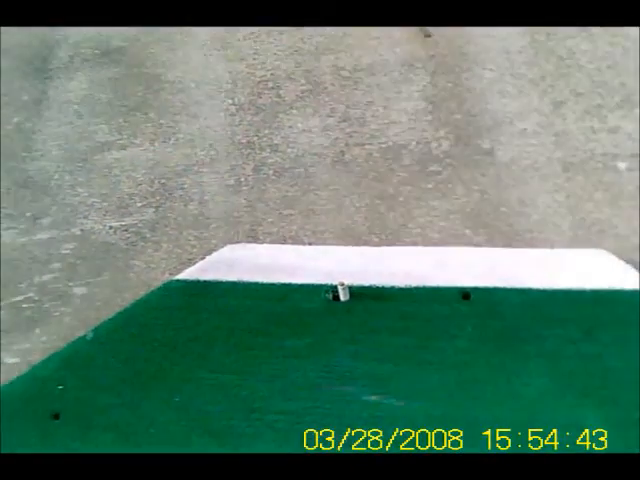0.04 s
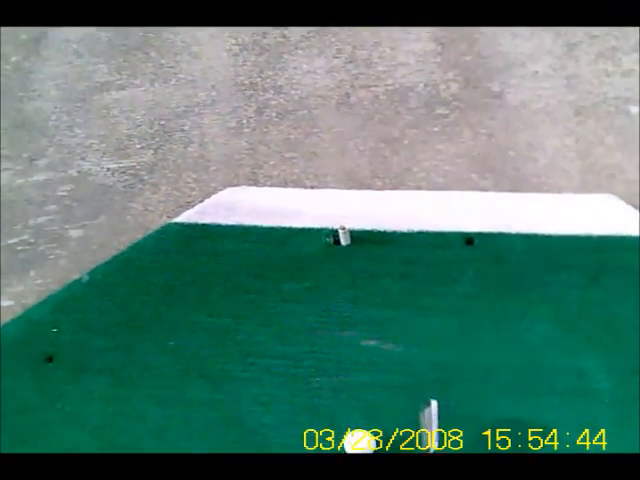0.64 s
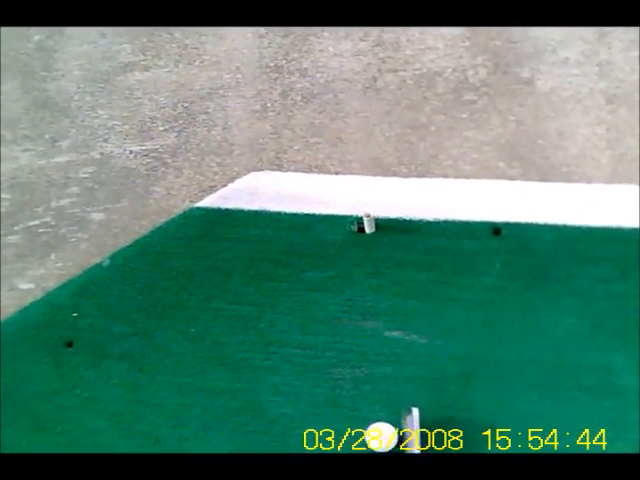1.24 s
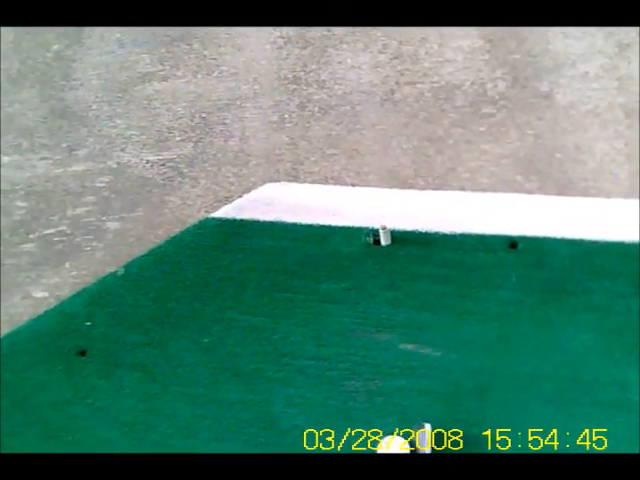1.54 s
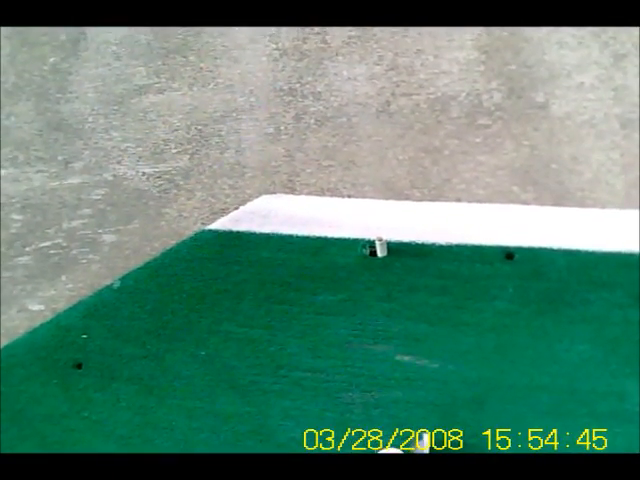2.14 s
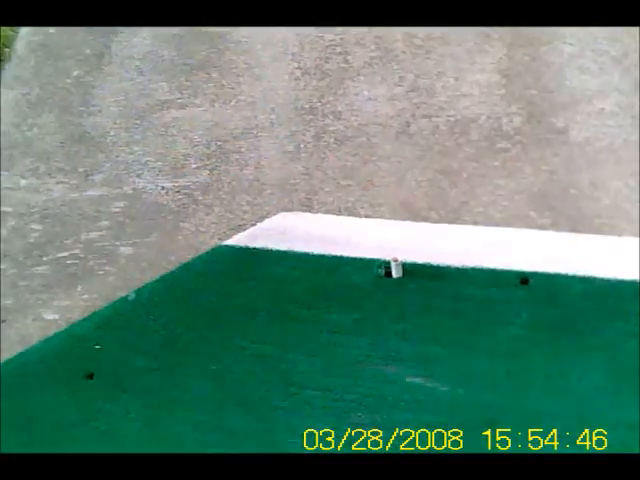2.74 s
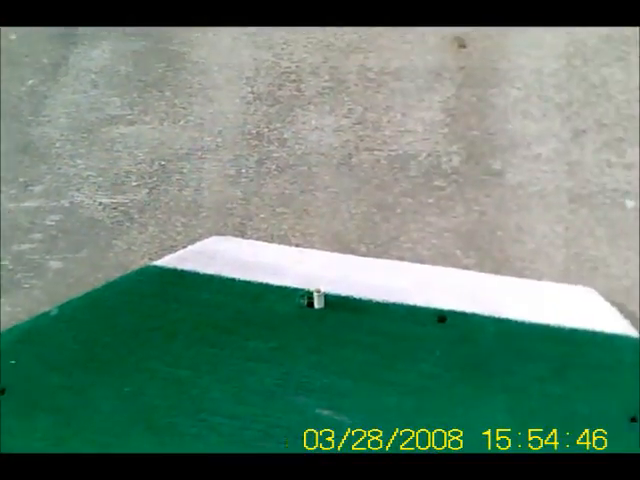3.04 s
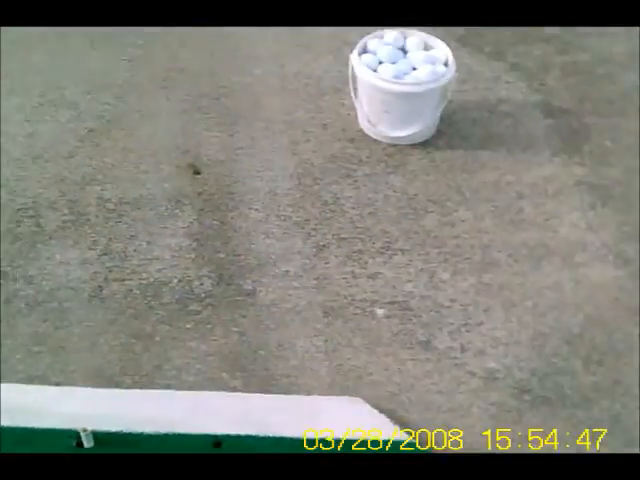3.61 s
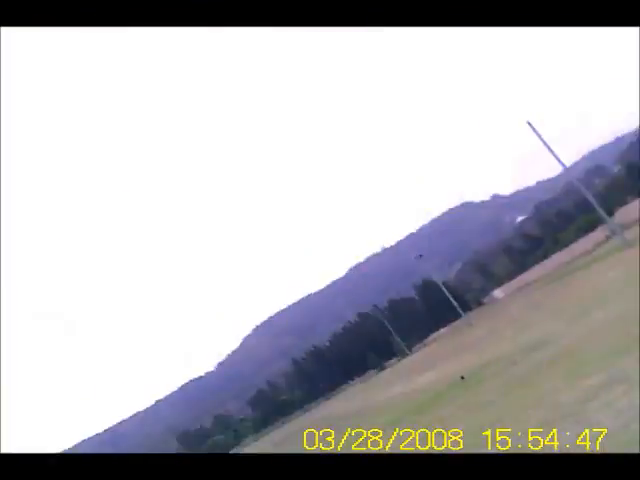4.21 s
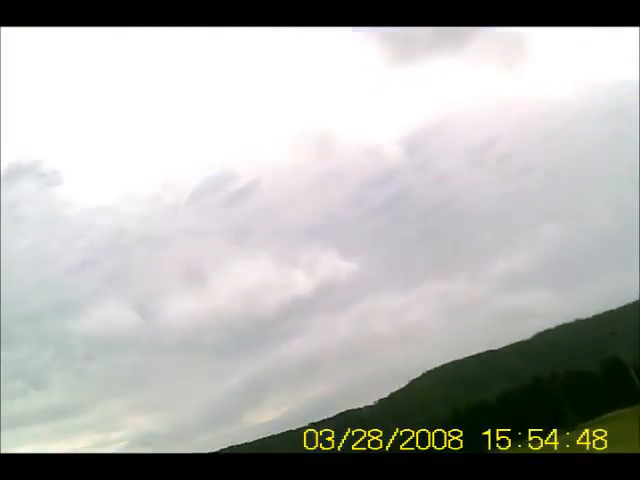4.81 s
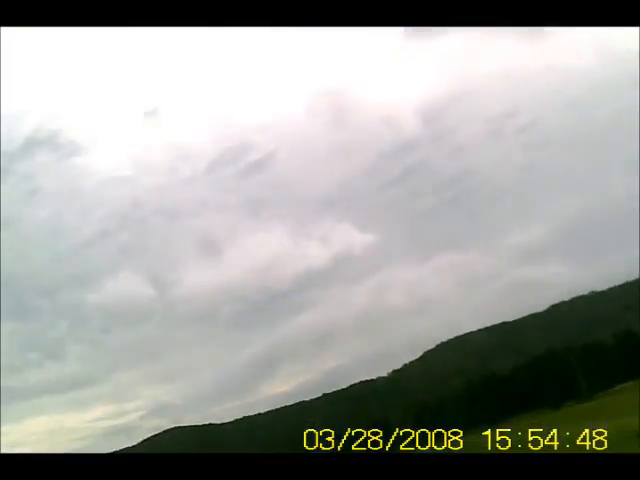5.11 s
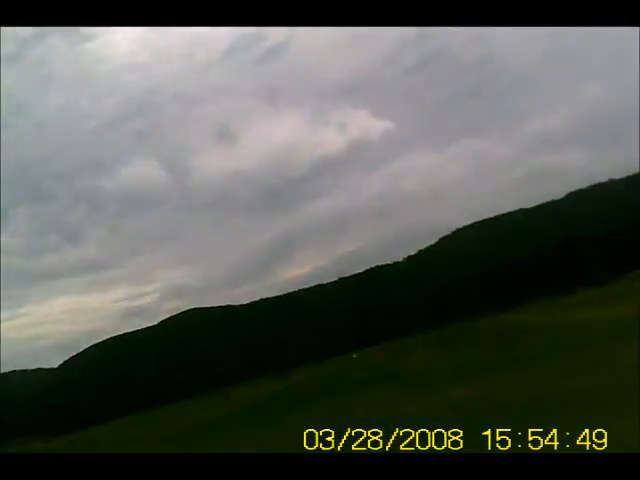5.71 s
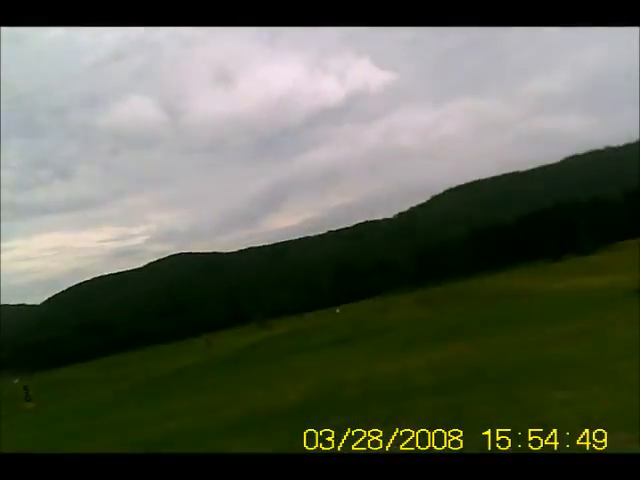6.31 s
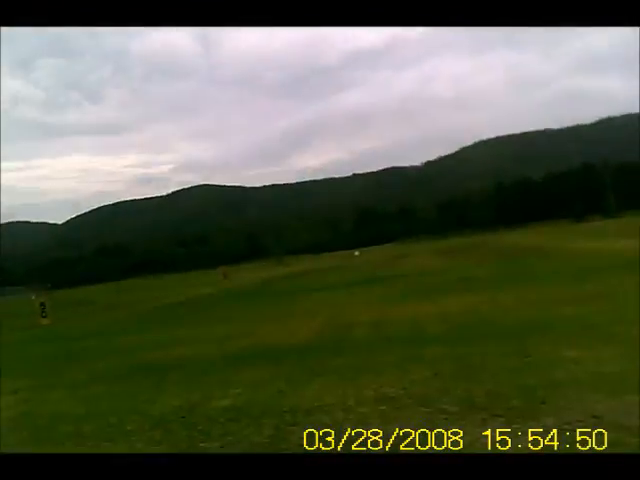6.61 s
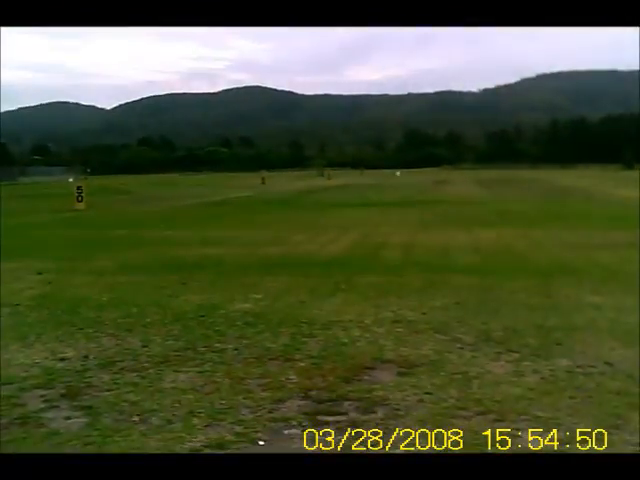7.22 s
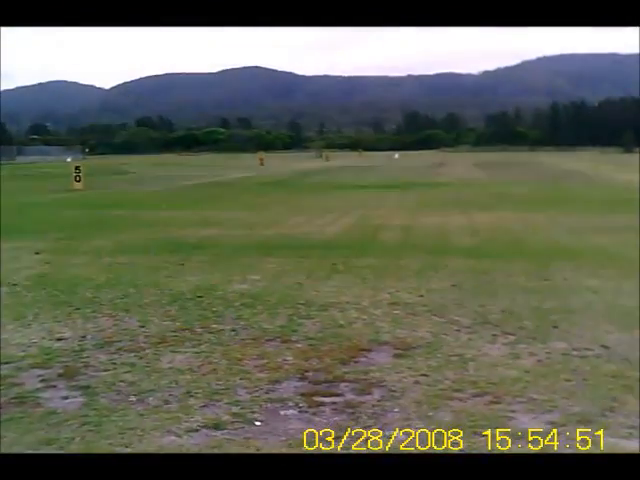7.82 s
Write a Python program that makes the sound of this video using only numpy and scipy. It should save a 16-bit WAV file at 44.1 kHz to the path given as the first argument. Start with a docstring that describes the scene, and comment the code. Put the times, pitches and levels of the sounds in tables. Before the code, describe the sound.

At an open driving range, gusts of wind rumble and flutter on a small hand-held microphone over a low, distant drone. About halfway through, a golf club swishes briefly and strikes a ball off a mat with one close, sharp, very loud crack. The wind then eases, a few faint birds chirp far away, and near the end a sleeve rustles and fingers tick softly on the camera.

```python
"""A driving range: a golf shot from a mat, heard close to a small hand-held camera.
The open field hisses, a low drone dies away and birds call far off. Turbulent gusts buffet the
microphone. The club swishes down, the impact excites the modes of its head and of the mat's board,
and the peak overloads the input. Friction makes a sleeve rustle as the camera follows the ball."""
import sys
import numpy as np
from scipy import signal
from scipy.fft import rfft, irfft, next_fast_len
from scipy.io import wavfile
from scipy.ndimage import uniform_filter1d, map_coordinates

SR = 44100
rng = np.random.default_rng(int(sys.argv[2]) if len(sys.argv) > 2 else 0)


def master(y):
    """Save y as 16-bit WAV."""
    cut = np.clip(np.atleast_2d(y).T, -1, 1)
    pcm = np.round(cut * 32767)  # scale
    wavfile.write(sys.argv[1], SR, pcm.astype(np.int16))


N = 350595
T = np.arange(N) / SR
STRIKE_S, FLUTTER_FROM_S = 3.7933, 6.1

# distant rush, steady at first, then growing in surges: (time [s], level [dB])
RUSH_LEVEL = [(0, -52), (.7, -53), (.97, -51.5), (1.22, -54), (1.65, -50.5), (2.3, -52.5), (3.4, -52),
              (4.25, -49.5), (4.66, -47), (4.79, -45.5), (4.96, -46.5), (5.08, -48), (5.3, -45),
              (5.6, -47.5), (5.9, -43), (6.12, -45), (6.33, -42.5), (6.54, -44), (6.74, -39.5),
              (6.98, -41.5), (7.25, -40.5), (7.5, -38.5), (7.87, -38)]
# far birds: (time [s], length [s], start [Hz], middle [Hz], end [Hz], waver [Hz], level [dB])
BIRD_CALLS = [(.86, .24, 1280, 1330, 1285, 30, -55), (4.772, .08, 2620, 3130, 2980, 12, -51.5),
              (4.926, .072, 2620, 3270, 3030, 12, -50.5), (7.525, .06, 2750, 2500, 2470, 25, -48),
              (7.772, .06, 2720, 2490, 2420, 25, -44.5)]
# breeze between the gusts: (time [s], level [dB])
BREEZE_LEVEL = [(0, -48), (1.1, -47), (2.2, -43), (3.7, -44), (4, -53.5), (4.25, -50), (4.5, -43), (5, -44),
                (5.6, -50), (6.7, -48), (7.95, -42.5)]
# gusts on the microphone: (time [s], length [s], level [dB])
WIND_GUSTS = [(0, 0.15, -25), (0.169, 0.062, -26.5), (0.24, 0.035, -31), (0.313, 0.018, -36),
              (0.373, 0.031, -35.5), (0.699, 0.16, -48.5), (1.409, 0.04, -35.5), (1.444, 0.032, -32.5),
              (1.508, 0.021, -32), (1.548, 0.049, -33.5), (1.673, 0.048, -34.5), (1.814, .02, -35),
              (1.856, 0.025, -32.5), (2.017, .11, -38.5), (2.16, 0.11, -35), (2.385, 0.029, -29.5),
              (2.417, 0.041, -25), (2.465, .035, -31), (2.498, 0.039, -26.5), (2.547, 0.0345, -32),
              (2.583, 0.051, -28), (2.639, 0.074, -33.5), (2.718, 0.21, -38), (2.962, 0.049, -26.5),
              (3.02, 0.069, -29), (3.094, .06, -23.5), (3.153, .14, -21), (3.306, 0.079, -20.5),
              (3.397, 0.12, -28.5), (3.509, 0.07, -23.5), (3.595, 0.046, -25), (3.658, .12, -33),
              (3.703, 0.0273, -30), (3.785, 0.03, -32), (3.839, 0.052, -39), (4.424, 0.012, -35.5),
              (4.484, 0.048, -36), (4.549, 0.099, -40.5), (4.68, 0.02, -36), (4.717, 0.051, -33),
              (4.909, 0.03, -37.5), (4.963, 0.016, -37), (5.012, 0.017, -35.5), (5.12, 0.026, -38),
              (5.467, 0.037, -38.5), (6.264, 0.037, -41.5)]
# slow pressure swings: (time [s], level [dB])
RUMBLE_LEVEL = [(0, -18.5), (.4, -31.5), (1.2, -31), (2.9, -28.5), (3.4, -23.5), (4.1, -32.5),
                (4.55, -26.5), (5.2, -30), (6.4, -28), (6.75, -23), (7.1, -26), (7.95, -21.5)]
# large, slow eddies booming on the microphone: (time [s], half-length [s], level [dB])
EDDY_BOOMS = [(0.744, 0.049, -26), (1.699, 0.039, -23.5), (2.62, .06, -24), (3.4, 0.092, -25),
              (4.512, .045, -24), (4.721, 0.037, -27.5), (5.503, 0.036, -29.5), (6.681, 0.028, -27.5)]
# cores of the hardest eddies: (time [s], relative level [dB], half-width [s])
EDDY_CORES = [(0.024, -19.5, 0.00059), (0.067, -15.5, 0.00053), (0.093, -11, 0.00071), (0.117, -15, .0006),
              (0.2, -17.5, 0.00048), (.211, -15.5, 0.00062), (1.453, -19, 0.00081), (1.69, -21, 0.0027),
              (1.719, -29, .0007), (2.397, -10.5, 0.0013), (2.433, -11.5, 0.00052), (2.44, -15.5, 0.00051),
              (2.45, -11, 0.00067), (2.506, -14, 0.00057), (2.572, -11.5, 0.0012), (2.622, -14.5, .0006),
              (2.98, -19.5, 0.00057), (3.094, -10, .0005), (3.203, -7.5, 0.00039), (3.252, -8.5, 0.00049),
              (3.273, -9.5, 0.00052), (3.313, -14, 0.00041), (3.333, -9.5, 0.00032),
              (3.356, -12.5, 0.00034), (3.376, -8, 0.00036), (3.422, -5.5, .0025), (3.517, -7.5, 0.00069),
              (3.546, -12, .0005), (3.559, -17, 0.00034), (3.64, -13.5, 0.00059), (3.706, -17, 0.00058),
              (4.431, -16.5, .001)]
# strokes of a sleeve past the camera: (time [s], half-length [s], level [dB])
SLEEVE_STROKES = [(6.831, 0.037, -37), (7.099, 0.046, -45.5), (7.364, 0.015, -52), (7.475, 0.029, -59)]
# fingers ticking on the camera body: (time [s], relative level [dB])
FINGER_TICKS = [(3.915, -37.5), (4.151, -40.5), (6.769, -28.5), (6.782, -26), (6.869, -26), (6.8877, -26),
                (7.0946, -31.5), (7.194, -35), (7.375, -28.5), (7.39, -32), (7.521, -43.5), (7.6033, -36)]
# scuffs of shoe, club or hand: (time [s], half-length [s], centre frequency [Hz], level [dB])
SCUFF_STROKES = [(0.912, 0.01, 3400, -56), (1.897, 0.014, 1198, -46), (1.909, 0.013, 1640, -45),
                 (3.817, 0.0031, 1490, -27), (3.836, 0.0032, 2320, -42), (3.853, 0.0049, 2303, -42.5),
                 (6.823, 0.01, 2306, -41), (6.832, 0.014, 3916, -46.5), (7.382, .007, 3210, -43.5),
                 (7.605, 0.0043, 2370, -40)]
# modes of club head and ball: (frequency [Hz], relative level [dB])
HEAD_MODES = [(1500, 2.5), (2000, -12), (2220, 0), (2410, 2), (2675, -12), (2860, -13), (3100, 0.5),
              (3330, -2.5), (3580, -4), (3850, -3.5), (4180, -3.5), (4420, -5), (4630, -4), (4850, -1.5),
              (5380, -4), (5870, 0), (6200, -5), (7100, -8.5), (7395, -4), (8090, -3), (9000, -1),
              (9660, 0), (10400, -3)]
# modes of the mat on its board: (frequency [Hz], relative level [dB], t60 [s])
MAT_MODES = [(524, -18, 0.022), (740.4, -12, 0.024), (998, -3, 0.023), (1403, -2, 0.021),
             (1614, 2.5, 0.017), (3300, -4, 0.014)]

# noise spectra: (frequency [Hz], relative spectral density [dB])
FIELD_SPECTRUM = [(60, -28), (200, -3.5), (380, -2.5), (550, -3), (850, -2), (1300, 1.5), (1700, 4),
                  (2000, -5.5), (2350, -8.5), (2800, -13.5), (3400, -15), (4500, -22.5), (10000, -22),
                  (11000, -31.5)]  # open range
HISS_SPECTRUM = [(200, -1), (3000, 12), (5500, 12), (8500, 9.5), (10200, 8), (11000, -7)]  # camera's self-noise
DRONE_SPECTRUM = [(35, -29), (55, 5), (66, 5.5), (78, -3.5), (105, -12), (170, -30), (270, -25.5),
                  (400, -28.5), (520, -32), (900, -44), (2000, -60.5)]  # distant drone
RUMBLE_SPECTRUM = [(8, -36), (18, 10), (30, -6), (48, -4.5), (65, -17.5), (90, -23), (140, -44.5),
                   (1200, -120)]  # slow eddies
THROB_SPECTRUM = [(30, -8), (55, 3), (75, 5), (110, -5), (150, -11), (1200, -120)]  # throb in the gusts
CLOTH_SPECTRUM = [(500, -28), (1500, 2), (2300, 7.5), (2800, -12), (3400, 9.5), (4200, -6.5), (4900, -13),
                  (6300, -9.5), (7800, -4), (10000, 6.5), (11000, -6)]  # sleeve and finger contact
WHOOSH_SPECTRUM = [(200, -14), (430, 7.5), (570, 18.5), (700, 2.5), (850, -2), (1060, 2), (1300, -6),
                   (1700, -6), (2500, -28), (3500, -18), (5000, -39.5), (10000, -52)]  # flow round the head
SHAFT_SPECTRUM = [(500, -3.5), (1100, -2), (1700, 1), (2400, -16), (3500, -4.5), (4500, -37),
                  (10000, -18.5)]  # flow round the shaft
CRACK_SPECTRUM = [(100, -11), (600, -11), (1900, 13), (2600, 5), (3500, 9.5), (4600, 3), (6600, -8.5),
                  (7400, 4.5), (10000, -0.5), (11000, 1.5)]  # face against ball


def amp(db):
    """Decibels to amplitude ratio."""
    return 10 ** (np.asarray(db) / 20)


def unit(x):
    """Normalisation to rms 1."""
    return x / np.sqrt(np.mean(x ** 2) + 1e-20)


def envelope(rows):
    """Linear interpolation of (time, level) points to one level per sample."""
    return np.interp(T, *np.transpose(rows))


def wobble(rate):
    """Random modulation: a spline through rate knots a second."""
    return map_coordinates(rng.standard_normal(int(N * rate / SR) + 4), [T * rate])


def swell(s, half_s, db):
    """Gaussian rise and fall of gain around time s."""
    return amp(db) * np.exp(-np.minimum(((T - s) / half_s) ** 2, 20))


def impulses(rate):
    """Poisson process: on average rate impulses a second, of random size."""
    return rng.standard_normal(N) * (rng.random(N) < rate / SR)


def filtered(x, response):
    """Zero-phase filtering: the spectrum of x times a frequency response."""
    size = next_fast_len(N + SR // 2)
    return irfft(rfft(x, size) * response(np.fft.rfftfreq(size, 1 / SR)), size)[:N]


def coloured(x, spectrum):
    """Spectral shaping by (frequency, level) points on a logarithmic axis."""
    hz, db = np.transpose(spectrum)
    return filtered(x, lambda f: amp(np.interp(np.log(f + 1), np.log(hz), db)))


def noise(spectrum):
    """Coloured Gaussian noise of rms 1."""
    return unit(coloured(rng.standard_normal(N), spectrum))


def butter(x, hz, kind, order=2):
    """Causal low- or high-pass filtering."""
    return signal.sosfilt(signal.butter(order, hz, kind, fs=SR, output="sos"), x)


def steady(x, seconds, low_hz=1):
    """Envelope normalisation: the running rms above low_hz is held at 1."""
    size = int(seconds * SR / 2)
    power = filtered(x, lambda hz: 1 / (1 + (low_hz / (hz + 1)) ** 10)) ** 2
    mean_power = uniform_filter1d(uniform_filter1d(power, size), size)
    return x / np.sqrt(np.abs(mean_power) + 1e-12)


def field(dips, waver_db=-0.5, ripple_db=0.87, flicker_db=-12, hiss_db=-60, whine_hz=7402, whine_db=-75):
    """Noise floor: distant rush, the camera's hiss and whine, and a flicker at each pressure dip."""
    far_db = envelope(RUSH_LEVEL)
    rush = amp(far_db + waver_db * wobble(4.6) + ripple_db * wobble(16)) * noise(FIELD_SPECTRUM)
    flicker = amp(far_db + flicker_db) * dips * noise(HISS_SPECTRUM)
    whine = amp(whine_db) * np.sqrt(2) * np.sin(2 * np.pi * whine_hz * T)
    return rush + amp(hiss_db) * noise(HISS_SPECTRUM) + flicker + whine


def drone(db=-33, hold_s=2.4, fade_db_per_s=23, tone_hz=398, tone_db=-25, waver_hz=4, waver_db=3):
    """Exponential decay: a low, distant drone with one faint wavering tone holds, then dies away."""
    level_db = db - fade_db_per_s * np.maximum(T - hold_s, 0)
    tone_gain = amp(tone_db + waver_db * wobble(4.8))
    tone = tone_gain * np.sin(2 * np.pi * np.cumsum(tone_hz + waver_hz * wobble(12)) / SR)
    return amp(level_db) * (steady(noise(DRONE_SPECTRUM), .2) + tone)


def far_whistle(at_s=4.76, half_s=0.2, centre_hz=2310, width_hz=110, db=-60):
    """Narrow-band noise has an airy pitch; it swells and fades in the distance."""
    band = filtered(rng.standard_normal(N), lambda hz: np.exp(-((hz - centre_hz) / width_hz) ** 2))
    return swell(at_s, half_s, db) * unit(band)


def birds(wet_db=-7, t60=0.4):
    """Frequency modulation: each call glides along a wavering arc and reverberates over the field."""
    calls, waver = np.zeros(N), wobble(110)
    for s, length, start_hz, middle_hz, end_hz, waver_hz, db in BIRD_CALLS:
        span = slice(int(s * SR), int((s + length) * SR))
        progress = (T[span] - s) / length
        arc = np.polyfit([0, .5, 1], [start_hz, middle_hz, end_hz], 2)
        hz = np.polyval(arc, progress) + waver_hz * waver[span]
        calls[span] += amp(db) * np.sin(np.pi * progress) * np.sin(2 * np.pi * np.cumsum(hz) / SR)
    tail = rng.standard_normal(SR // 2) * amp(-60 * T[:SR // 2] / t60)
    return calls + amp(wet_db) * signal.fftconvolve(calls, tail / np.linalg.norm(tail))[:N]


def wind_level(attack_s=0.01204, release_s=.014, sag_db_per_s=3):
    """Incoherent addition: gusts rise, sag and drop, summing in power with the breeze; returns dB."""
    t = np.arange(0, N / SR, .001)
    power = amp(np.interp(t, *np.transpose(BREEZE_LEVEL))) ** 2
    for start, length, db in WIND_GUSTS:
        age = t - start
        attack = np.clip(age / attack_s + .5, 0, 1)
        sag_db = sag_db_per_s * (np.clip(age, 0, length) - length / 2)
        release = np.exp(-np.clip((age - length) / release_s, 0, 20))
        power += (amp(db - sag_db) * attack * release) ** 2
    return np.interp(T, t, 10 * np.log10(power))


def flutter(start_hz=11, rise_hz_per_s=2.082, half_s=0.011, jitter_beats=0.098, spread_db=2):
    """A jittered pulse train: late on, brief pressure dips of depth near 1 come at a quickening rate."""
    rate_hz = (start_hz + rise_hz_per_s * (T - FLUTTER_FROM_S)) * (T > FLUTTER_FROM_S)
    beats = np.cumsum(rate_hz) / SR
    jitter, depth = rng.standard_normal((80, 2))[:int(beats[-1])].T
    at = np.searchsorted(beats, np.arange(len(jitter)) + 1 + jitter_beats * jitter)
    dip = np.exp(-(np.arange(-(SR // 20), SR // 20) / SR / half_s) ** 2)
    return signal.fftconvolve(np.bincount(at, amp(spread_db * depth), N)[:N], dip, "same")


def rumble(wind_db, dips, swing_db=3, calm_db=-5, dip_db=7, throb_db=-11, throb_slope=0.58):
    """Large-scale turbulence rocks the diaphragm, throbs in gusts, booms and settles into a flutter."""
    eddy_db = swing_db * wobble(12) + calm_db * np.clip(T - FLUTTER_FROM_S, 0, 1)
    eddies = amp(eddy_db) * steady(noise(RUMBLE_SPECTRUM), 0.12)
    deep = amp(envelope(RUMBLE_LEVEL)) * (eddies - amp(dip_db) * butter(dips, 2.2, "high", order=1))
    gust_gain = amp(throb_db + throb_slope * np.minimum(wind_db, -32))
    boom_gain = sum(swell(*boom) for boom in EDDY_BOOMS)
    return deep + np.hypot(gust_gain, boom_gain) * steady(noise(THROB_SPECTRUM), 0.027)


def buffet(wind_db, eddy_rate=1100, eddy_s=0.00066, lull_db=-47, puff_db=1.03, core_db=6):
    """Convected eddies press on the microphone: faster air makes pulses denser, shorter and stronger."""
    speed = 10 ** ((np.clip(wind_db, -42, -21.5) + 23) / 52)  # relative; 52 dB per decade of speed
    passed = np.cumsum(eddy_rate * speed) / SR
    jitter, size, height = rng.standard_normal((int(passed[-1]), 3)).T
    at = np.clip(np.searchsorted(passed, np.arange(len(jitter)) + jitter), 0, N - 1)
    width = eddy_s * SR / speed[at] * np.exp(.2 * size)
    lag = np.arange(-450, 451)
    pulses = height[:, None] * np.hanning(len(lag)) / (1 + (lag / width[:, None]) ** 2)
    samples = np.clip(at[:, None] + lag, 0, N + 1)
    pressure = np.bincount(samples.ravel(), pulses.ravel(), N + 2)[1:N + 1]
    # the flow comes in puffs; in the lulls it turns smooth and the eddies die out
    strength = amp(wind_db + puff_db * wobble(45)) / np.sqrt(1 + amp(lull_db - wind_db) ** 2)
    eddies = strength * steady(butter(pressure, 115, "high", order=3), 0.057, low_hz=138.7)
    # the hardest eddies pull the pressure down in their cores
    suction = sum(amp(db + core_db) / (1 + ((T - s) / half_s) ** 2) for s, db, half_s in EDDY_CORES)
    return eddies - butter(butter(suction, 200, "high", order=1), 1750, "low", order=6)


def sleeve(grain_rate=3000, rub_db=-9, rub_low_hz=1900, rub_high_hz=3000, flicker_db=2):
    """Sliding friction: in each stroke, cloth fibres catch in dense grains over a softer rub."""
    strokes = sum(amp(db) / (1 + np.abs((T - s) / half_s) ** 3) for s, half_s, db in SLEEVE_STROKES)
    grains = unit(coloured(impulses(grain_rate), CLOTH_SPECTRUM))
    rub = butter(rng.standard_normal(N), rub_low_hz, "high", order=4)
    rub = unit(butter(rub, rub_high_hz, "low", order=4))
    return strokes * amp(flicker_db * wobble(120)) * (grains + amp(rub_db) * rub)


def fingers(t60=0.02, gain_db=-6, crackle_from_s=6.6, crackle_rate=30, crackle_db=-38):
    """Damped impacts: fingers tick on the case; once the grip shifts, fainter ticks come at random."""
    ticks = sum(amp(db - 60 * np.abs(T - s) / t60) * (T >= s) for s, db in FINGER_TICKS)
    touches = rng.random(N) * (rng.random(N) < crackle_rate / SR) * (T > crackle_from_s)
    crackle = amp(crackle_db) * signal.fftconvolve(touches, amp(-60 * T[:SR // 20] / t60))[:N]
    return amp(gain_db) * (ticks + crackle) * noise(CLOTH_SPECTRUM)


def case_ring(slip_rate=260, gain_db=-1, stroke_share=0.43, low_hz=2160, high_hz=2420, t60=0.029):
    """Stick-slip friction in the hardest sleeve stroke excites two resonances of the camera's case."""
    s, half_s, db = SLEEVE_STROKES[0]
    stroke = amp(db + gain_db) / (1 + ((T - s) / (stroke_share * half_s)) ** 4)
    t = T[:SR // 20]
    modes = amp(-60 * t / t60) * (np.sin(2 * np.pi * low_hz * t) - np.sin(2 * np.pi * high_hz * t))
    return stroke * unit(signal.fftconvolve(impulses(slip_rate), modes)[:N])


def scuffs(octaves=0.4):
    """Friction noise: shoe and club brush the mat, and a hand the camera, in short, soft strokes."""
    out, bristles = np.zeros(N), rfft(rng.standard_normal(SR // 2))
    hz = np.fft.rfftfreq(SR // 2, 1 / SR)
    for s, half_s, centre_hz, db in SCUFF_STROKES:
        band = np.exp(-(np.log2((hz + 1) / centre_hz) / octaves) ** 2)
        brush = unit(irfft(bristles * band))
        span = slice(int(s * SR) - len(brush) // 2, int(s * SR) + len(brush) // 2)
        out[span] += amp(db) * np.exp(-((T[span] - s) / half_s) ** 2) * brush
    return out


def reflections(x, dull_hz=3400, near_db=-29, near_t60=0.077, far_db=-30, far_t60=0.57):
    """Scattering: ground and tee line return a short, dull tail, the open range a faint, longer one."""
    tail = lambda t60: unit(rng.standard_normal(SR) * amp(-60 * T[:SR] / t60)) / np.sqrt(SR)
    response = amp(near_db) * tail(near_t60) + amp(far_db) * tail(far_t60)
    return butter(signal.fftconvolve(x, response)[:N], dull_hz, "low", order=4)


def swish(head_db=-25, shaft_db=-42):
    """Aerodynamic noise peaks just before impact; the thin shaft hisses higher and for longer."""
    passing = lambda lead_s, half_s: 1 / (1 + ((T - STRIKE_S + lead_s) / half_s) ** 2)
    head = amp(head_db) * noise(WHOOSH_SPECTRUM) * passing(lead_s=0.0082, half_s=0.012)
    shaft = amp(shaft_db) * noise(SHAFT_SPECTRUM) * passing(lead_s=0.0092, half_s=0.065)
    return head + shaft


def mat_slap(t, delay_s=.0046, knock_db=1, soft_s=0.0005, thud_db=-13, thud_hz=170, thud_t60=0.027):
    """Damped modes: over the low thud of the impact, the sole slaps the mat and its board knocks."""
    age = np.maximum(t - delay_s, 0)
    knock = sum(amp(knock_db + db - 60 * age / t60) * np.sin(2 * np.pi * hz * age)
                for hz, db, t60 in MAT_MODES)
    cushion = 1 - np.exp(-age / soft_s)  # the turf softens the onset
    thud = amp(thud_db - 60 * t / thud_t60) * np.sin(2 * np.pi * thud_hz * t)
    return knock * cushion + thud


def face_crack(t, burst, ring_db=-4, burst_db=-6, rise_s=0.000076, travel_s=.0025, contact_s=.0059,
               after_db=-19, after_hold_s=.0046, after_t60=0.045, after_top_hz=3700):
    """Impact excitation: the face meets the ball in a burst of noise and rings the head's modes."""
    # dispersion: bending waves cross the head more slowly in the low modes
    lowest_hz = HEAD_MODES[0][0]
    ring = unit(sum(amp(db) * np.sin(2 * np.pi * hz * (t - travel_s * np.sqrt(lowest_hz / hz)))
                    for hz, db in HEAD_MODES))
    face = (1 - np.exp(-t / rise_s)) * (amp(ring_db) * ring + amp(burst_db) * burst)
    # the treble stops with the contact; only the lower modes ring on briefly
    contact = np.exp(-(t / contact_s) ** 24)
    decay = amp(after_db - 60 * np.maximum(t - after_hold_s, 0) / after_t60)
    after = decay * butter(face, after_top_hz, "low", order=4)
    return contact * face + (1 - contact) * after


def strike():
    """Two collisions milliseconds apart, face on ball and sole on mat, fuse into one transient."""
    span = slice(int(STRIKE_S * SR), int(STRIKE_S * SR) + SR // 4)
    t, out = np.maximum(T[span] - STRIKE_S, 0), np.zeros(N)
    out[span] = face_crack(t, noise(CRACK_SPECTRUM)[span]) + mat_slap(t)
    return out


def scene():
    """Superposition of wind, field and handling sounds with the shot and its reflections."""
    shot, wind_db, dips = strike(), wind_level(), flutter()
    wind = buffet(wind_db) + rumble(wind_db, dips)
    background = drone() + field(dips) + far_whistle() + birds()
    golf = swish() + shot + reflections(shot)
    handling = sleeve() + fingers() + case_ring() + scuffs()
    return (background + wind + handling + golf)[None]


def record(dry, overload=0.99, band_hz=10750, top_hz=16000,
           click_s=2.0209, click_db=-19, click_decay_s=0.001116):
    """Clipping: the shot overloads the input, and again after the camera's low-pass; one small click."""
    overloaded = np.clip(dry[0], -overload, overload)
    narrow = filtered(overloaded, lambda hz: 1 / np.sqrt(1 + (hz / band_hz) ** 90))
    click = -amp(click_db) * (T >= click_s) * np.exp(-np.abs(T - click_s) / click_decay_s)
    clipped = np.clip(narrow + click, -1, 1)
    return filtered(clipped, lambda hz: 1 / np.sqrt(1 + (hz / top_hz) ** 80))[None]


dry = scene()
out = record(dry)
master(out)
```